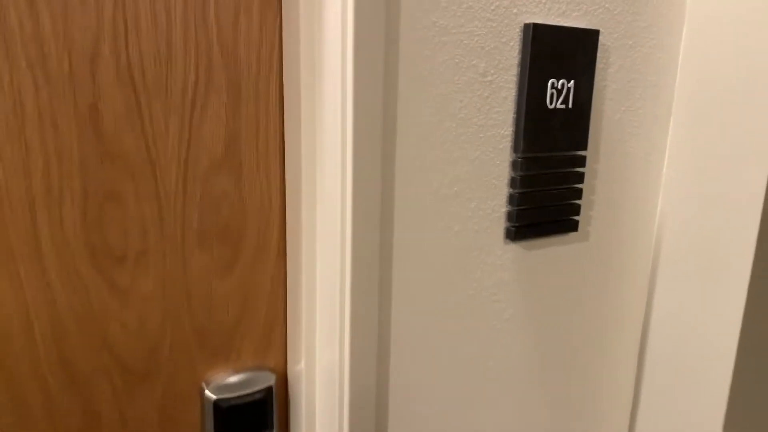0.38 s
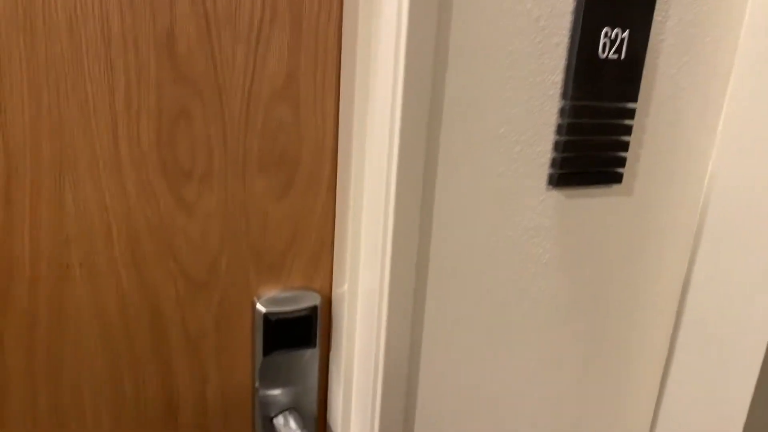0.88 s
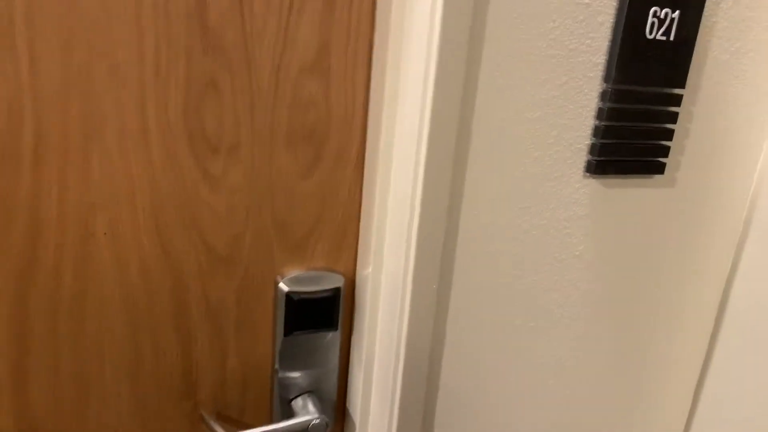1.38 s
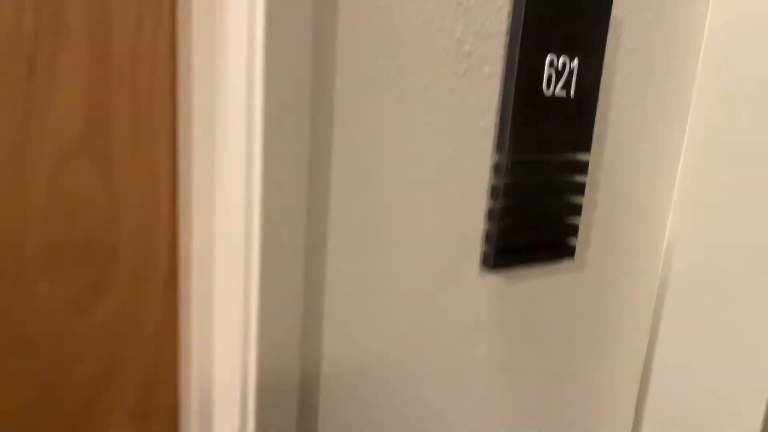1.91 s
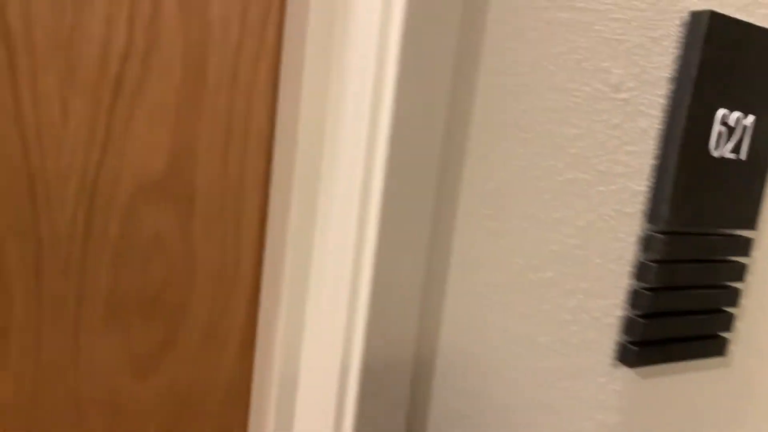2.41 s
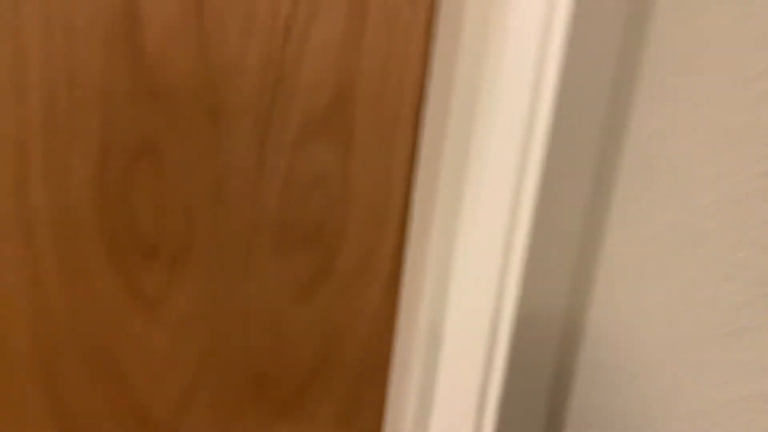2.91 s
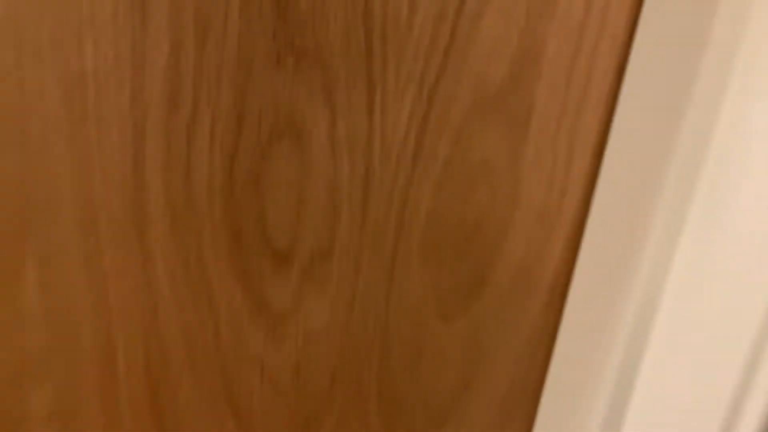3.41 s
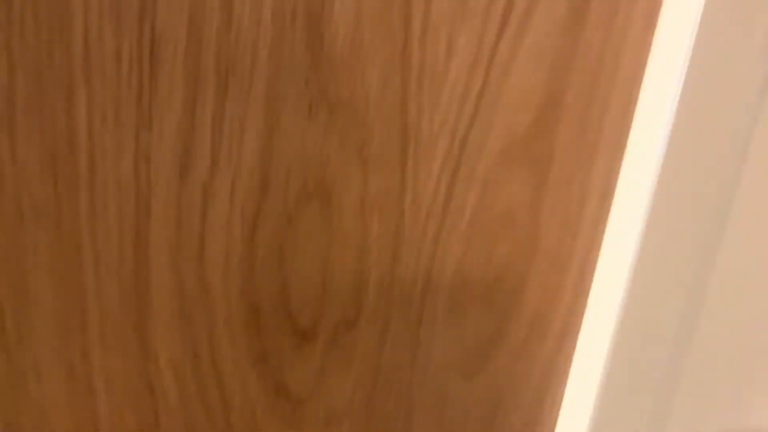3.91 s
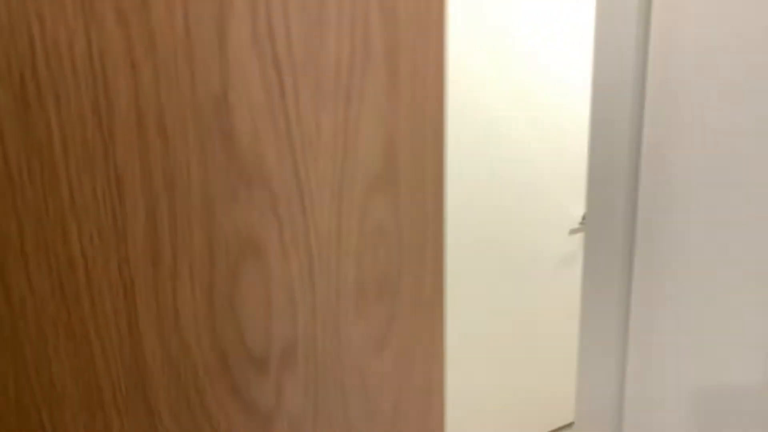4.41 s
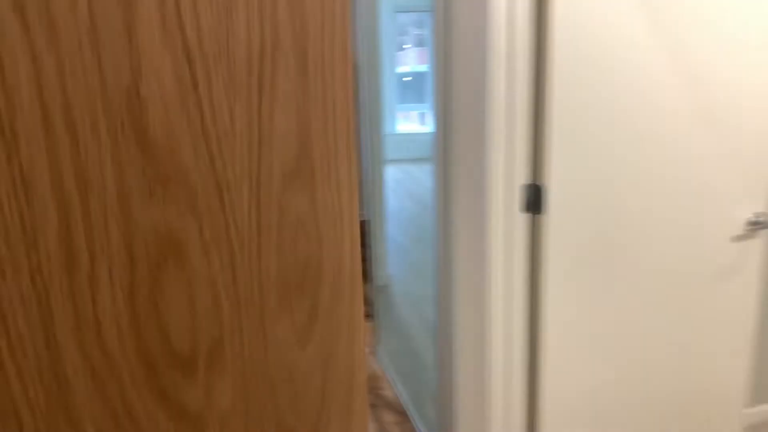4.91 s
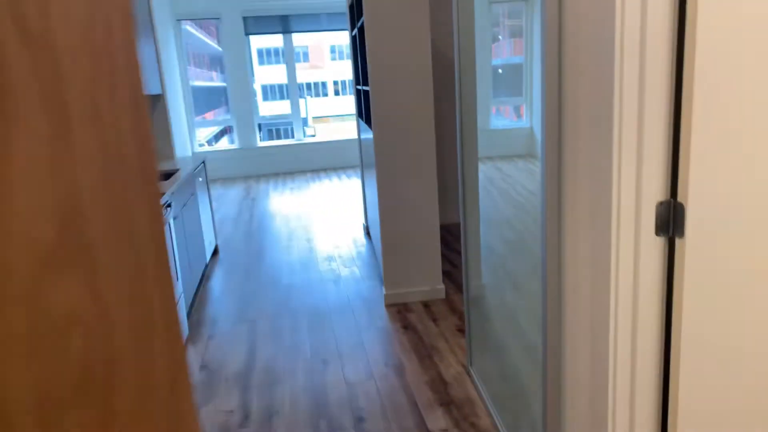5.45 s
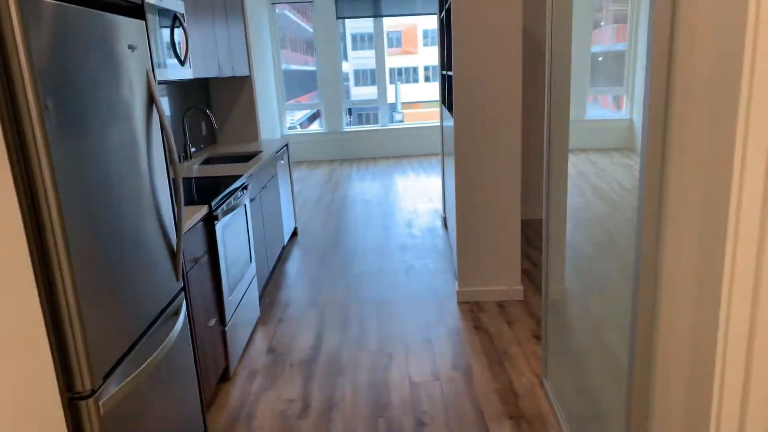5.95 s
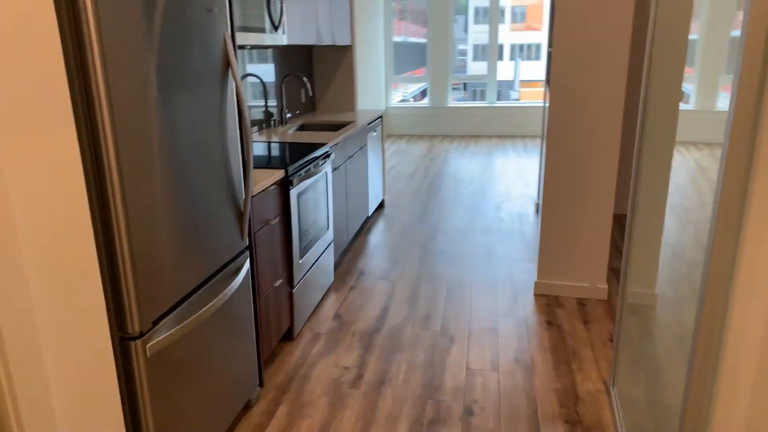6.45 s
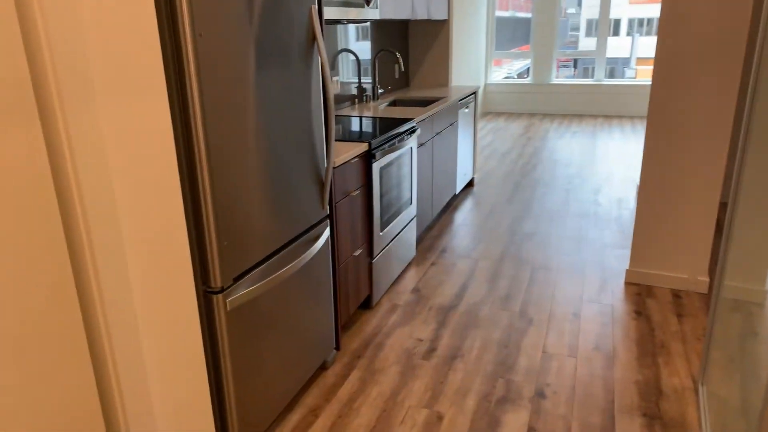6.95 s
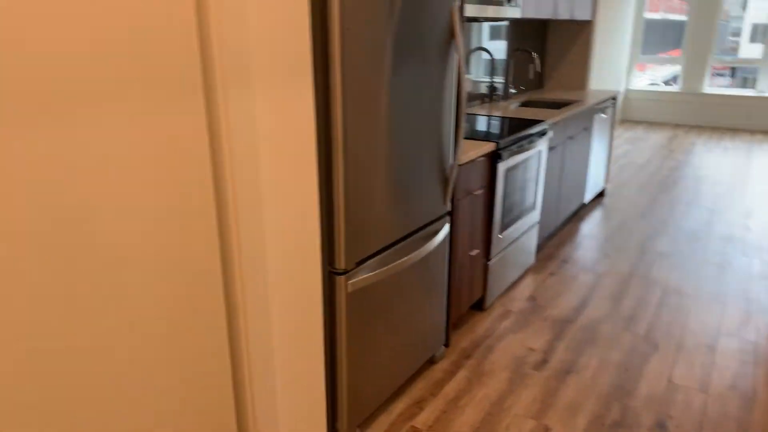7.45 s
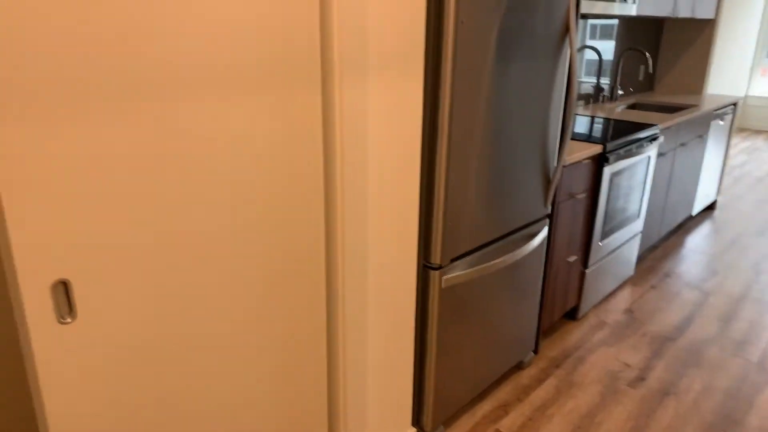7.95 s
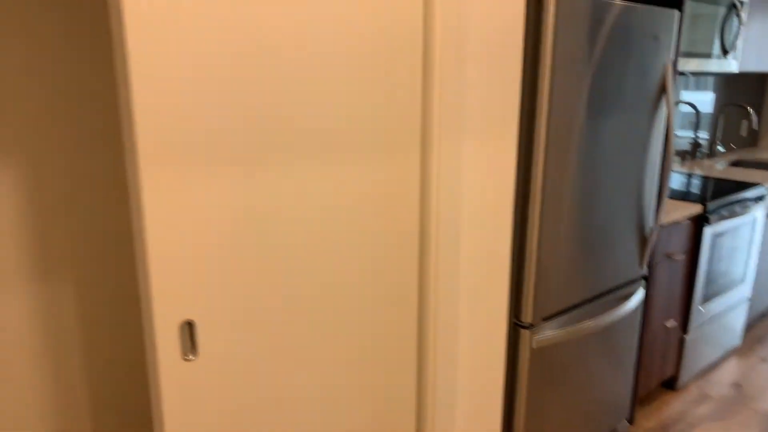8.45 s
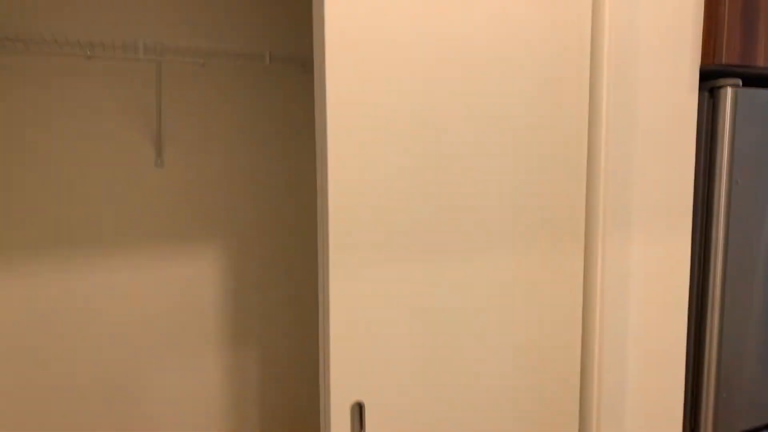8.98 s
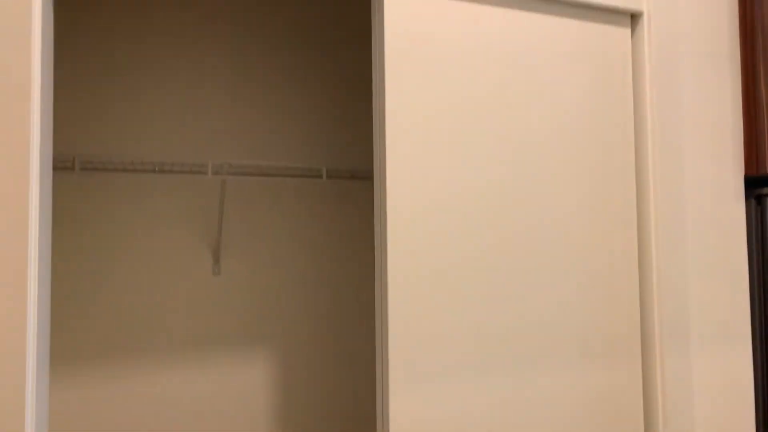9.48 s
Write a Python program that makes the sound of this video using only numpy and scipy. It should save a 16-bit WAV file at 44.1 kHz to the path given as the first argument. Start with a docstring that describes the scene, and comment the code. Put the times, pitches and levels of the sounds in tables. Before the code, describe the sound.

Faint key jingling, a sharp bolt clack and booming door thud, then echoing shuffles and a second knock and sliding-panel clack over low hum.

```python
"""Keys jingle in a hallway, as bursts of rattling contact that ring the metal; ventilation noise and mains
tones lie under everything. A key ticks into a lock, bolt and latch snap back as blows on resonant metal and
wood, and a wooden door opens on an empty flat with booming thuds. Shoes and sleeves scuff as grainy noise, the
key ticks out again, the door swings shut behind and a sliding panel knocks. Bare walls answer with diffuse
echo; a hand-held phone hears it all."""
import sys
import numpy as np
from scipy import signal
from scipy.fft import rfft, irfft, next_fast_len
from scipy.io import wavfile
from scipy.ndimage import uniform_filter1d, map_coordinates

SR = 44100
rng = np.random.default_rng(int(sys.argv[2]) if len(sys.argv) > 2 else 0)


def to_wav(sig):
    """Store sig (one row per channel, or 1-D mono) as 16-bit WAV at the path in sys.argv[1].

    Samples outside -1..1 are clipped; the rate is SR.
    """
    pcm = np.clip(np.atleast_2d(sig), -1, 1) * 32767
    pcm = np.round(pcm).astype(np.int16)
    wavfile.write(sys.argv[1], SR, pcm.T)  # frames by channels


def boost(x):
    """Linear amplitude factor 10**(x/20) for a level x in decibels (scalar or array-like)."""
    u = np.asarray(x, float) / 20
    return 10 ** u


N = 423360

# strength of the mains tones along the walk [t/s, level/dB]
HUM_LEVEL = [(0.0, -52.5), (0.6, -56), (1.31, -56), (1.68, -53.5), (2.35, -53.5), (3.7, -48), (4.12, -47.5),
             (4.39, -55.5), (4.62, -88.5), (4.97, -48), (5.67, -52.5), (6.3, -48.5), (7.25, -49.5),
             (7.62, -53.5), (7.89, -52), (8.45, -41), (8.95, -61), (9.3, -47.5), (9.6, -54)]
# strength of the ventilation along the walk [t/s, level/dB]
AIR_LEVEL = [(0, -58), (1.0, -58), (1.3, -58), (2, -55.5), (3, -56.5), (4.4, -54.5), (5.2, -52.5),
             (5.9, -54.5), (7, -53.5), (8.8, -51), (9.6, -51)]
# colour of the ventilation noise [f/Hz, relative density/dB per Hz]
AIR_COLOUR = [(15, -53.5), (25, -6), (70, -2.5), (102, -0.5), (195, -4.5), (301, -3), (451, -10.5),
              (531, -10), (624, -14.5), (863, -15.5), (1740, -26.5), (2550, -32), (3820, -39.5),
              (16000, -57)]
# mains tones [f/Hz, relative level/dB]
MAINS_TONES = [(60, -13.5), (120, -4.5), (240, -12)]
# how strongly the walls answer along the walk [t/s, level/dB]
ECHO_LEVEL = [(0, -12.5), (3.3, -5), (4.3, -9), (6, -4), (7, -7), (9.6, 0.5)]
# how long the hallway walls ring [f/Hz, time to fall 60 dB/s]
HALL_DECAY = [(100, 1.4), (500, 1.9), (2000, 0.79), (5000, 0.38), (10000, 0.087), (16000, 0.067)]
# how long the empty flat rings [f/Hz, time to fall 60 dB/s]
FLAT_DECAY = [(100, 0.95), (500, 1.08), (2000, 1.12), (4000, 1.47), (7000, 0.65), (16000, 0.057)]
# rubbing of shoes, cloth and key, levels before the swell
# [start t/s, end t/s, body level/dB, hiss level/dB, hiss centre f/Hz]
SCUFFS = [(0.635, .76, -69, -67, 6750), (0.943, 1.073, -57.5, -65.5, 12300), (1.29, 1.463, -69, -74, 5950),
          (1.523, 1.593, -60, -84, 6000), (1.57, 2.092, -59.5, -80, 6060), (2.208, 2.363, -67, -76.5, 5800),
          (2.512, 2.772, -50.5, -54.5, 1140), (2.808, 2.91, -61, -65, 9100),
          (3.664, 3.87, -48, -72.5, 5040), (4.105, 4.504, -59, -88, 8220),
          (4.565, 4.639, -58, -71.5, 12000), (4.719, 5.07, -67, -54, 760), (5.285, 5.352, -59, -67, 12000),
          (5.489, 5.585, -69, -90, 12100), (5.719, 5.805, -63, -82.5, 12000),
          (5.989, 6.197, -49, -55.5, 5600), (6.268, 6.44, -42.5, -50, 1000),
          (6.599, 6.832, -56, -53.5, 5200), (7.152, 7.27, -68.5, -82.5, 6360),
          (7.204, 7.51, -58.5, -66.5, 8800), (7.716, 8.01, -59, -74.5, 9000),
          (8.237, 8.447, -53.5, -69, 9660)]
# colour of the rubbing body [f/Hz, relative density/dB per Hz]
RUB_COLOUR = [(180, -36.5), (300, -1), (572, -7), (1560, -9), (2300, -13.5), (2850, -10.5), (3200, -17.5),
              (3800, -14), (5300, -18.5), (7000, -24.5), (9100, -34), (15400, -120)]
# dull thuds of door leaf and feet [t/s, peak level/dB, pitch f/Hz]
THUDS = [(3.25, -41.5, 260), (3.314, -34.5, 267), (3.345, -33, 155), (3.389, -28.5, 365),
         (3.62, -21.5, 370), (3.612, -21, 159.4), (3.618, -16, 88), (3.632, -21.5, 168), (3.671, -21.5, 88),
         (3.773, -27, 88), (3.815, -28.5, 302), (3.842, -29, 89.4), (5.39, -35, 293), (6.189, -36, 313),
         (6.358, -30.5, 283), (7.411, -31, 135), (7.575, -25, 292), (7.592, -20.5, 158),
         (7.617, -21.5, 112), (7.937, -23.5, 490), (8.347, -35, 176), (8.847, -42, 71.7), (8.978, -41, 110),
         (9.018, -38, 220), (9.2, -51.5, 126.3)]
# resonances of door leaf and floor [f/Hz, width/Hz, level/dB]
PANEL_MODES = [(60.3, 36, 3.5), (88, 5, 5.5), (120, 79, -6.5), (165, 28, 2), (257, 44, 3), (335, 12, -7.5),
               (358, 110, -13.5)]
# blows on lock, latch and doors
# [t/s, peak level/dB, loudest pitch f/Hz, treble level against the body/dB, hardness (no unit)]
BLOWS = [(3.094, -38.5, 1220, -5, 3), (3.346, -35.5, 1090, -17.5, 2.4), (3.387, -37.5, 1420, -3, 1.7),
         (3.393, -27.5, 1480, -38, 2), (3.407, -31, 517, -23, 2.1), (3.519, -37.5, 850, -22, 2.5),
         (3.607, -24, 492, -18.5, 3.8), (3.62, -30, 880, -17, 7.2), (3.666, -28.5, 1500, -24, 2),
         (3.7636, -25, 4470, 3, 1.24), (3.768, -26.5, 3960, 10, 9.7), (3.768, -16.5, 1350, -7, 5.4),
         (3.783, -25.5, 1000, -15, 5.2), (3.8148, -19.5, 2700, -22.5, 10), (3.815, -21, 1150, -23, 9),
         (3.825, -26.5, 1170, -17.5, 7.1), (3.837, -21.5, 1090, -12.5, 3.9), (3.842, -32, 2456, 4, 7.5),
         (3.848, -30.5, 1130, -12.5, 4.4), (3.88, -36.5, 855, -22, 0.4), (4.635, -43, 706, -28, 3.8),
         (4.703, -31.5, 1400, -12.5, 1.8), (4.706, -29.5, 777, -19.5, 1.5), (4.797, -40, 725, -6, 1.8),
         (4.882, -45.5, 890, -7, 2.6), (5.022, -43, 786, -21.5, 6.5), (5.374, -39.5, 860, -26, 2.5),
         (5.388, -34.5, 820, -26.5, 3.1), (5.541, -46.5, 605, -33.5, 5.2), (5.939, -51, 1500, 1.5, 0.58),
         (6.014, -40.5, 2600, -14, 2.1), (6.127, -37.5, 5570, -2, 0.85), (6.182, -36.5, 676, -30, 4.5),
         (6.356, -48, 1060, -23, 9), (6.382, -33, 3020, -18, 1.5), (6.79, -39.5, 3600, 3.5, 2.6),
         (7.255, -39, 495, -9, 7), (7.398, -34.5, 540, -31, 2.3), (7.48, -28, 2160, -20, 11),
         (7.523, -31.5, 1360, 2, 19), (7.566, -29, 665, -11, 4.6), (7.58, -21.5, 780, -17.5, 5.8),
         (7.9346, -20.5, 1670, -10, 4.2), (7.937, -22, 2570, -14, 1.34), (7.943, -23.5, 1030, -10, 4.5),
         (8.35, -35.5, 1070, -11.5, 5.6), (8.4233, -27.5, 3180, -20, 3.5), (8.424, -30.5, 1710, -20, 2.2),
         (8.464, -30, 990, -7, 5.3), (9.033, -42, 3300, -17, 3)]
# resonances of lock plate and door skin [f/Hz, width/Hz, level/dB]
LOCK_MODES = [(520, 450, -3.5), (1030, 260, 3), (1670, 580, 0.5), (2023, 230, 6.5), (2644, 1230, 5.5),
              (3920, 2850, 5), (5750, 990, 0.5)]
# narrow modes of handle, latch and door skin that ring on after a blow [f/Hz, width/Hz, basic level/dB]
RINGING_MODES = [(380, 33, 4.5), (518, 16, -3), (705, 5.3, -4), (776, 12, -7.5), (855, 44, 5),
                 (1000, 54, 0.5), (1090, 20, 3), (1350, 11, 6.5), (1647, 33, 0.5), (1956, 18, -2.5),
                 (2110, 20, -10.5), (2287, 35, 0), (2600, 8, 0), (3020, 100, -11.5), (3400, 41, -18.5)]
# keys touching [t/s, peak level/dB, loudest pitch f/Hz, ring level over the tick/dB, treble level in the tick/dB]
TOUCHES = [(0.1888, -45.5, 3020, 0, -17), (0.207, -48.5, 3040, 3, -25), (0.2402, -46, 2780, 14, -38),
           (0.264, -49, 2780, 11, -32), (0.282, -43, 2600, 25, -54), (0.294, -43, 2900, 15, -25),
           (0.3361, -41.5, 2650, 1, -21), (0.655, -45.5, 7760, 5, -13), (0.688, -58.5, 7540, 2, -24),
           (0.771, -53, 2750, -7, -29), (0.79, -49.5, 3720, 13, -24), (0.818, -44.5, 8500, -1, -7.5),
           (0.904, -52, 6160, -6.5, -13), (1.3332, -38.5, 2800, -2.5, -7.5), (1.34, -39, 2750, -8, 2),
           (1.347, -43.5, 3670, -17, -27), (1.3747, -48, 2800, -14, -25), (1.437, -51.5, 2600, -6, -37),
           (1.453, -53, 2730, 16, -44), (1.54, -51.5, 3400, -35, -23.5), (1.5556, -58, 3560, -5, -26),
           (1.6247, -54, 2540, -1, -30), (1.725, -38.5, 3980, -9, -22), (1.7872, -45.5, 4350, -23, -18),
           (1.795, -33.5, 8230, -14.5, -10.5), (1.8292, -52, 3590, -15, -24.5),
           (1.8643, -37.5, 3250, -27, -24), (2.532, -54, 5350, 0, -17), (2.8254, -43, 7050, -1, -11.5),
           (2.8562, -39, 4000, -6, -19.5), (2.879, -47, 8000, -14, -17), (2.917, -47, 4400, -5, -16),
           (2.948, -38, 4360, -2, -7), (2.95, -47.5, 4400, -18, -16.5), (3.0967, -28.5, 4200, -4, -22),
           (3.099, -34, 11570, 13.5, -4.5), (3.106, -40.5, 7900, -3.5, -12.5),
           (3.127, -47.5, 4200, -9, -29), (3.115, -38, 14000, 6, -16.5), (3.205, -39.5, 3040, 1, -28),
           (4.797, -48, 5460, -15, -21), (5.017, -47.5, 4300, -7, -29), (5.492, -56.5, 11800, -17.5, -6.5),
           (7.255, -55.5, 4990, -14, 1), (7.266, -48, 7050, -8, -16), (7.355, -46, 3800, -16, -30),
           (7.4527, -51.5, 3500, -23.5, -32.5), (7.479, -30.5, 7050, -3.5, -24),
           (7.502, -30.5, 4800, -6, -20.5), (7.523, -22.5, 7250, -6, -17), (8.0904, -46.5, 2550, -25, -24),
           (8.279, -54.5, 2720, -7, -1), (9.01, -55.5, 3800, -25, -30)]
# modes of freely hanging keys [f/Hz, basic level/dB, time to fall 60 dB/s]
KEY_MODES = [(2270, -26, 0.19), (2550, -5.5, 0.11), (2730, 2.5, 0.037), (2930, 2, 0.068),
             (3234, 7.5, 0.024), (3510, -8, 0.28), (3800, -5, 0.13), (3900, -10.5, 0.158),
             (4370, -5.5, 0.21), (5350, 0.5, 0.07), (6070, -16.5, .06), (6660, -8.5, 0.11),
             (7050, -5, 0.29), (7560, -3, 0.099), (7800, -3, 0.1), (8190, -11.5, 0.4), (8960, -11, 0.25),
             (9700, -8, 0.099), (11570, -15.5, 0.087), (11900, -8, 0.087), (14000, 0.5, 0.072),
             (14360, -6, 0.07)]
# a key's teeth ticking over the pins, going in and coming out
# [start t/s, number of teeth, middling peak level/dB, middling ring f/Hz]
TEETH = [(2.567, 9, -43.5, 5400), (6.2907, 7, -46, 2970)]

INSIDE_S = 3.8  # the phone passes the doorway
SWELL_PER_S, SWELL_MOST = 1.78, 0.54  # share of a stroke spent swelling: per second of its length, and at most
PATCHY_DB = 3  # a stroke's colour wanders
THUD_RATTLE_S, THUD_RATTLE_POWER = 0.11, 0.3  # rattle of a 200 Hz thud; deeper thuds rattle shorter
BLOW_RATTLE_S, BLOW_RATTLE_POWER = 0.097, -1.5  # rattle of a 1 kHz blow of hardness 4; high ones settle sooner
SOFT_LINGERS = 0.87  # power by which soft blows rattle longer
RING_DB, RING_REACH = -9.5, 0.55  # ringing against the blow; how far in log pitch modes still answer
TOUCH_DB, TOUCH_S = -46, 0.047  # a middling touch: peak level, rattle time in seconds
TOUCH_SHORTENS = 0.7  # dB less rattle time per dB harder
KEY_SCATTER_DB = 4  # each touch wakes the modes unevenly
GRIP_DAMPS, FREE_DB = 0.66, -2  # share of ring time left in the grip; level of what hangs free and rings in full
TOOTH_S, TOOTH_SCATTER_DB = 0.0148, 2  # shortest time between teeth to build on, unevenness of level
LAST_GAP_EXTRA, GAP_EXTRA_FADES = 1.55, 0.36  # last gap longer by this share; factor per gap before it


def unit(x):
    """Scales a sound to rms 1."""
    return x / np.sqrt(np.mean(x ** 2) + 1e-20)


def loudest(sound):
    """Peak of a sound, judged over its strongest few milliseconds."""
    return 2 * np.sqrt(uniform_filter1d(sound ** 2, size=160).max())


def along(points, hz):
    """Reads (Hz, value) points on a log axis."""
    f, value = np.transpose(points)
    return np.interp(np.log(hz + 1), np.log(f + 1), value)


def curves(rows):
    """Gives one value per sample for each column after the time."""
    s, *columns = np.transpose(rows)
    return [np.interp(np.arange(N) / SR, s, column) for column in columns]


def wobble(rate):
    """A smooth random curve through `rate` random points a second."""
    points = rng.standard_normal(int(N * rate / SR) + 4)
    return map_coordinates(points, [np.arange(N) * rate / SR])


def filtered(x, response):
    """Multiplies the spectrum of x by a complex response of frequency."""
    m = next_fast_len(2 * len(x) if len(x) < SR else len(x) + SR // 2)
    return irfft(rfft(x, m) * response(np.fft.rfftfreq(m, 1 / SR)), m)[:len(x)]


def resonances(peaks):
    """Adds up causal resonances (Hz, width Hz, dB), with alternating signs."""
    def response(f):
        return sum((-1) ** k * boost(db) * 1j * f * width / (centre ** 2 - f * f + 1j * f * width)
                   for k, (centre, width, db) in enumerate(peaks))
    return response


def noise(spectrum):
    """Noise of rms 1 with the given colour."""
    return unit(filtered(rng.standard_normal(N), lambda hz: boost(along(spectrum, hz))))


def rattle(t, t60, rise=0.0003):
    """A contact: a quick rise, then uneven micro-bounces that die away."""
    bounces = boost(3.9 * np.repeat(rng.standard_normal(len(t) // 64 + 1), 64)[:len(t)])
    fade = boost(-60 * t / np.clip(t60, 0.002, 0.4))
    onset = 1 - np.exp(-t / np.clip(rise, 0.0001, 0.03))
    return fade * onset * bounces * rng.standard_normal(len(t))


def add(track, s, sound, db):
    """Mixes a sound in at time s with its peak at db."""
    track[round(s * SR):][:len(sound)] += boost(db) * sound / loudest(sound)


def ventilation_and_hum():
    """Air rush is coloured noise, mains hum is sines; both shift as the phone moves through the rooms."""
    t = np.arange(N) / SR
    tones = np.zeros(N)
    for hz, db in MAINS_TONES:
        strength = boost(db + 1.9 * wobble(1.7))
        tones += strength * np.sin(2 * np.pi * hz * t + 0.68 * wobble(6.2))
    air = boost(curves(AIR_LEVEL)[0] + 0.76 * wobble(2.9)) * noise(AIR_COLOUR)
    return air + boost(curves(HUM_LEVEL)[0]) * tones


def walls(x, decay, size, blur):
    """Bare walls store the sound's energy and give it back diffusely, each frequency dying at its own speed."""
    hz, _, z = signal.stft(x * boost(curves(ECHO_LEVEL)[0]), SR, nperseg=size)
    energy = uniform_filter1d(np.abs(z) ** 2, size=blur, axis=0)
    kept = boost(-120 * size / 2 / SR / along(decay, hz))  # share of energy left after one frame
    stored = np.array([signal.lfilter([0, 1 - k], [1, -k], row) for k, row in zip(kept, energy)])
    diffuse = signal.stft(rng.standard_normal(N), SR, nperseg=size)[2]
    diffuse = diffuse / np.sqrt(np.mean(np.abs(diffuse) ** 2))
    return signal.istft(diffuse * np.sqrt(np.abs(stored)), SR, nperseg=size)[1][:N]


def scuffs():
    """Each stroke swells and fades: noise made grainy by tiny catches, with a hiss that depends on the surface."""
    out, body = np.zeros(N), noise(RUB_COLOUR)
    grain = unit(boost(2.2 * wobble(250) + 1.2 * wobble(30)))
    for start, end, body_db, hiss_db, hiss_hz in SCUFFS:
        length_s = end - start
        crest = start + length_s * min(SWELL_PER_S * length_s, SWELL_MOST)
        span = np.arange(round(start * SR), round(end * SR))
        swell = np.sin(np.interp(span / SR, [start, crest, end], [0, np.pi / 2, np.pi])) ** 0.97
        band = resonances([(hiss_hz, 0.92 * hiss_hz, 0)])
        hiss = unit(filtered(rng.standard_normal(len(span)), lambda f: band(f) ** 2))
        out[span] += swell * (boost(body_db) * body[span] + boost(hiss_db) * hiss)
    # a random pattern, smooth over pitch and time, makes the colour patchy
    z = signal.stft(grain * out, nperseg=256)[2]
    patches = uniform_filter1d(rng.standard_normal(z.shape), size=5, axis=0)
    patches = uniform_filter1d(patches, size=9, axis=1)
    return signal.istft(z * unit(boost(PATCHY_DB * unit(patches))), nperseg=256)[1][:N]


def thuds():
    """Padded pushes set the door leaf and the floor booming."""
    out, t = np.zeros(N + SR), np.arange(SR // 2) / SR
    leaf = resonances(PANEL_MODES)
    soft = lambda f: 1 / (1 + 1j * f / 500) ** 2  # a padded contact passes little treble
    bass_cut = lambda f: 1j * f / (45 + 1j * f)
    for s, db, top_hz in THUDS:
        spot = resonances([(top_hz, top_hz ** 2 / 900, 17)])
        spread_s = THUD_RATTLE_S * (top_hz / 200) ** THUD_RATTLE_POWER
        push = t * np.exp(-2 * np.pi * top_hz * t)  # one smooth shove, with loose rattling
        contact = 3 * unit(push) + unit(rattle(t, spread_s, 0.01))
        add(out, s, filtered(contact, lambda f: soft(f) * bass_cut(f) * (leaf(f) + spot(f))), db)
    return out[:N]


def door_blows():
    """Each blow rattles the lock plate and cracks in the treble; long rattles build up slower, soft blows are dull."""
    out, t = np.zeros(N + SR), np.arange(SR // 2) / SR
    plate = resonances(LOCK_MODES)
    crack = resonances([(6850, 2500, -5.5), (14000, 2700, -9.5)])
    for s, db, top_hz, treble_db, hardness in BLOWS:
        spread_s = BLOW_RATTLE_S * (top_hz / 1000) ** BLOW_RATTLE_POWER * (4 / hardness) ** SOFT_LINGERS
        rise = 0.021 * spread_s
        # the struck spot rings; hard blows spread wider
        spot = resonances([(top_hz, 0.07 * hardness * top_hz, 14 - 2.2 * hardness)])
        dull = lambda f, wider: 1 / (1 + 1j * f / (wider * hardness * top_hz)) ** 2
        thin = lambda f: 1j * f / (0.31 * top_hz + 1j * f)  # a small part barely moves the low modes
        # modes far in pitch from the struck spot answer less
        woken = [(hz, width, mode_db + rng.normal(0, 1) - 9 * (np.log(hz / top_hz) / RING_REACH) ** 2)
                 for hz, width, mode_db in RINGING_MODES]
        ringing = filtered(rattle(t, 0.12 * spread_s, rise), resonances(woken))
        add(out, s, ringing, db + RING_DB)
        body = [filtered(rattle(t, spread_s, rise), lambda f: dull(f, 0.36) * thin(f) * part(f))
                for part in (plate, spot)]
        add(out, s, sum(body), db)
        treble_contact = rattle(t, 0.53 * spread_s, 1.6 * rise)
        treble = filtered(treble_contact, lambda f: dull(f, 2.2) ** 2 * crack(f))
        add(out, s, treble, db + treble_db)
    return out[:N]


def key_teeth():
    """Teeth tick over the lock pins one by one; the key slows at the end, so the gaps grow."""
    out, t = np.zeros(N + SR), np.arange(SR // 20) / SR
    for start, teeth, tooth_db, ring_hz in TEETH:
        before_last = np.arange(round(teeth) - 1)[::-1]
        gaps = TOOTH_S * (1 + LAST_GAP_EXTRA * GAP_EXTRA_FADES ** before_last)
        for s in start + np.cumsum([0, *gaps]):
            tooth_hz = ring_hz * boost(rng.normal(0, 0.42))  # each tooth rings a little off
            metal = resonances([(1130, 200, 12), (2700, 300, 6), (tooth_hz, 250, 11),
                                (5200, 2600, 1), (10700, 6000, -4)])
            tick = filtered(rattle(t, 0.026), metal)
            add(out, s, tick, rng.normal(tooth_db, TOOTH_SCATTER_DB))
    return out[:N]


def key_jingle():
    """Each touch ticks and rings the keys, most of all the modes near its loudest pitch; hard touches are short."""
    out, t = np.zeros(N + SR), np.arange(SR // 3) / SR
    hz, level_db, t60 = np.transpose(KEY_MODES)[:, :, None]
    dying = boost(-60 * t / (GRIP_DAMPS * t60)) + boost(FREE_DB - 60 * t / t60)
    for s, db, top_hz, ring_db, treble_db in TOUCHES:
        spread_s = TOUCH_S * boost(-TOUCH_SHORTENS * (db - TOUCH_DB))
        contact = rattle(t, spread_s, 0.0054 * spread_s)
        struck_db = level_db + rng.normal(0, KEY_SCATTER_DB, hz.shape)
        struck_db += 14 * np.exp(-(np.log(hz / top_hz) / 0.052) ** 2)
        # touches with more treble wake the high modes more
        struck_db += 0.7 * (treble_db + 15) * np.clip(hz / 2500 - 1.4, 0, 1)
        # keys rub on each other, which blurs every pitch
        drift = np.cumsum(rng.normal(0, 0.05, (len(hz), len(t))), axis=1)
        modes = np.sum(boost(struck_db) * dying * np.sin(2 * np.pi * hz * t + drift), axis=0)
        ring = signal.fftconvolve(contact, modes)[:len(t)]
        tick = filtered(contact, resonances([(top_hz, 0.16 * top_hz, 0), (6000, 4000, -14),
                                             (12500, 6000, treble_db)]))
        add(out, s, tick / loudest(tick) + boost(ring_db) * ring / loudest(ring), db)
    return out[:N]


def scene():
    """Mixes the near sounds, their echo in hallway and flat, and the background."""
    bright = scuffs() + door_blows() + key_teeth() + key_jingle()
    deep = thuds()
    inside = np.arange(N) > INSIDE_S * SR
    echo = walls(bright * ~inside, HALL_DECAY, size=512, blur=3)
    echo += walls(bright * inside, FLAT_DECAY, size=512, blur=5)
    echo += boost(4.0) * walls(deep, FLAT_DECAY, size=2048, blur=3)
    return (bright + deep + echo + ventilation_and_hum())[None]


def band_limit(x):
    """A steep low-pass at the top of the band."""
    return signal.sosfilt(signal.butter(12, 16660, fs=SR, output="sos"), x)


def record(dry):
    """The phone's microphone drops the deepest bass and the top."""
    bass_cut = lambda f: (1j * f / 33 / (1 + 1j * f / 33)) ** 4
    top_cut = lambda f: 1 / np.sqrt(1 + (f / 15900) ** 40)
    mic = filtered(dry[0], lambda f: bass_cut(f) * top_cut(f))
    return band_limit(mic[None])


dry = scene()
out = record(dry)
to_wav(out)
```